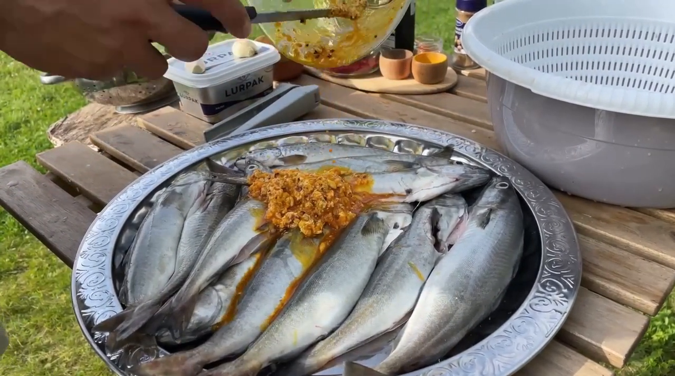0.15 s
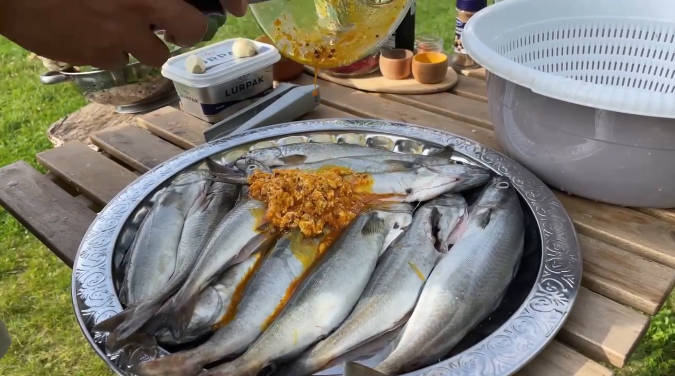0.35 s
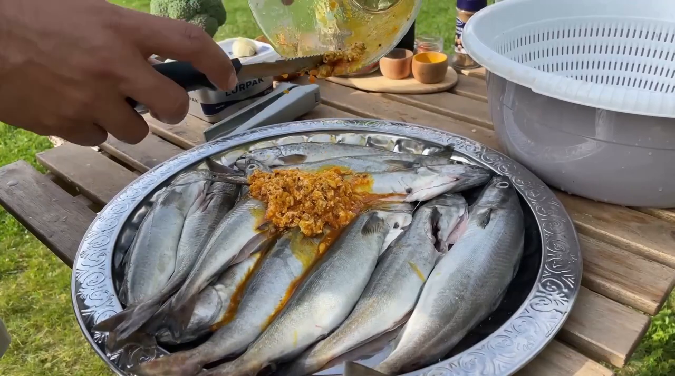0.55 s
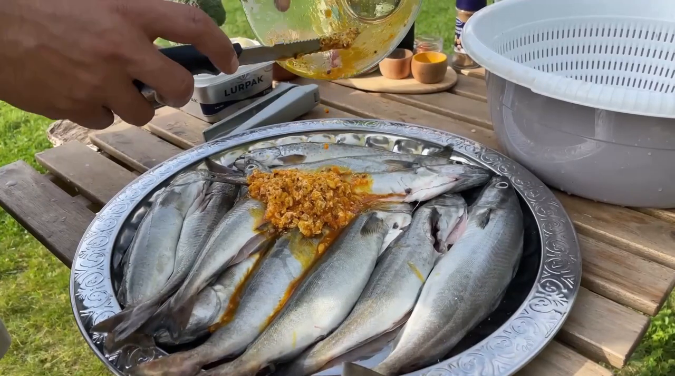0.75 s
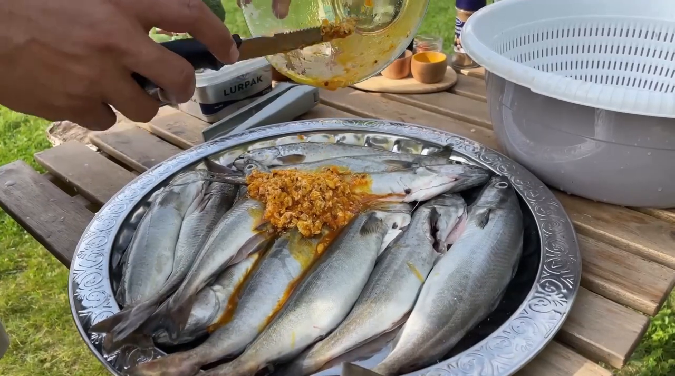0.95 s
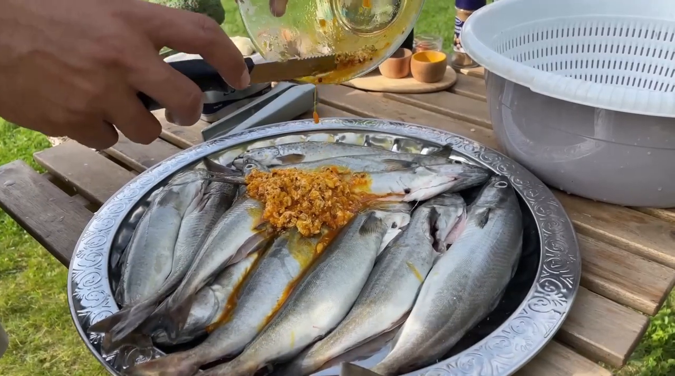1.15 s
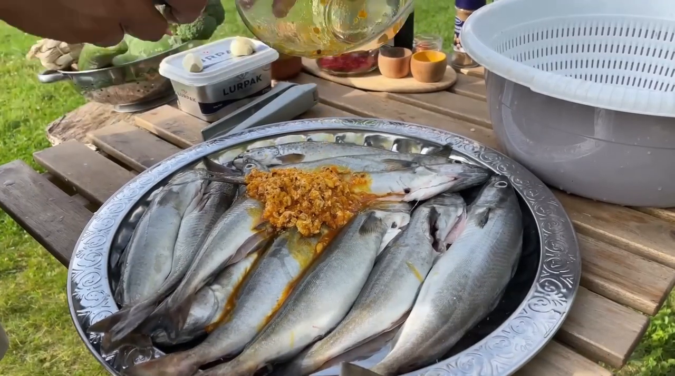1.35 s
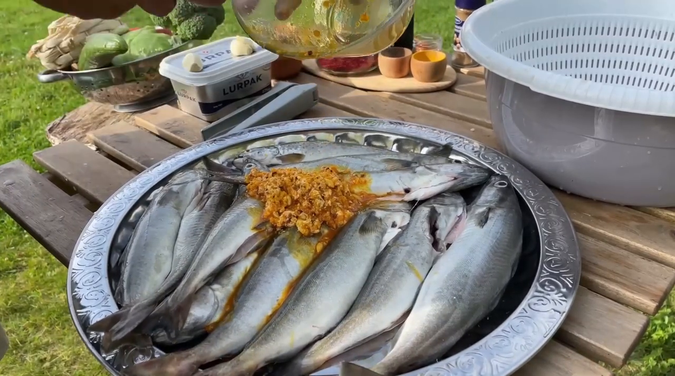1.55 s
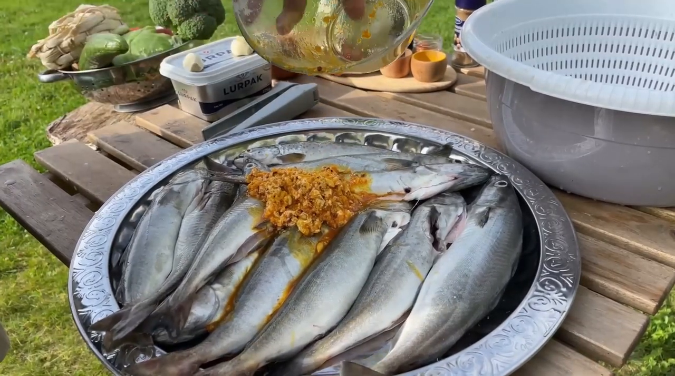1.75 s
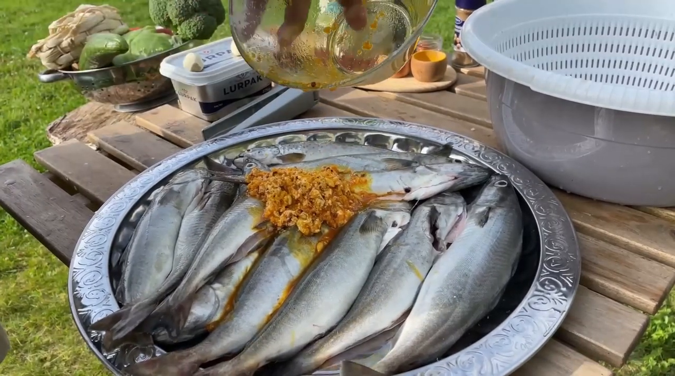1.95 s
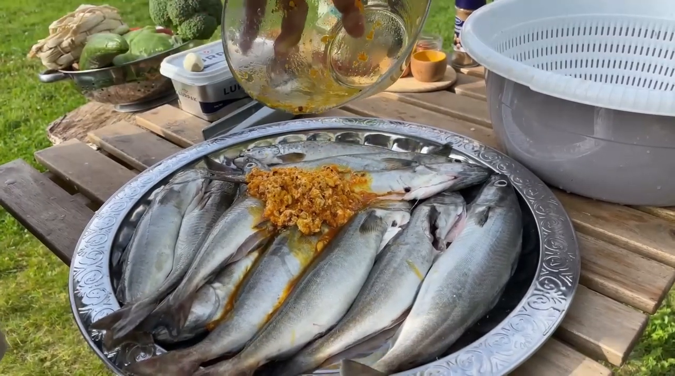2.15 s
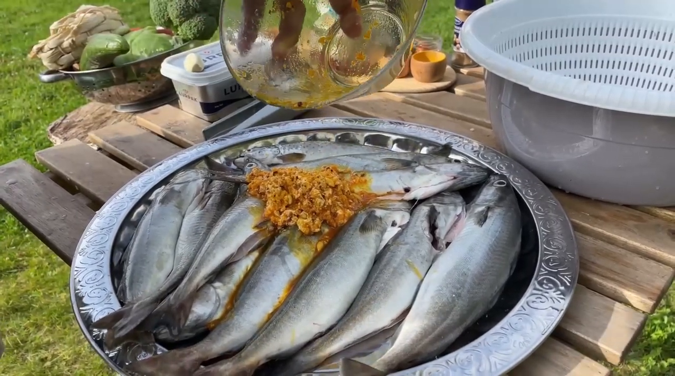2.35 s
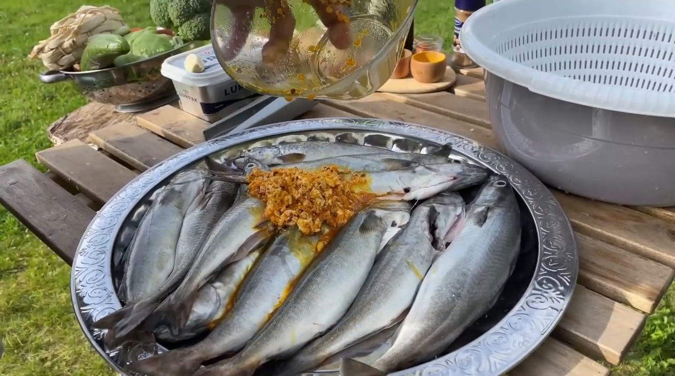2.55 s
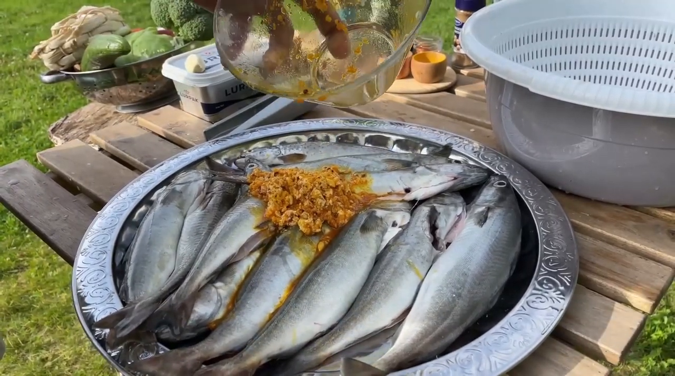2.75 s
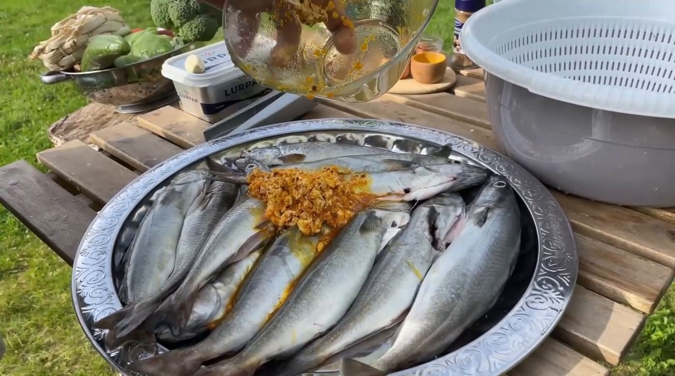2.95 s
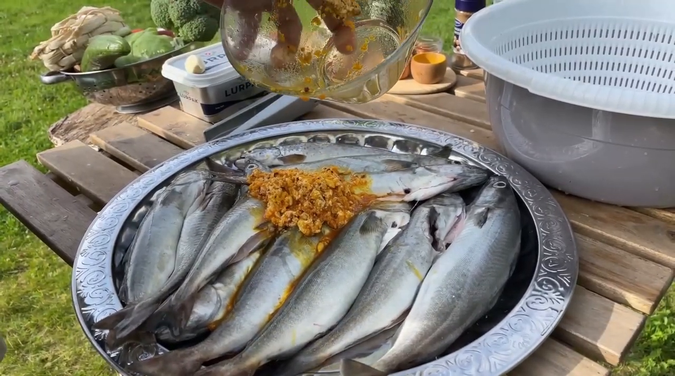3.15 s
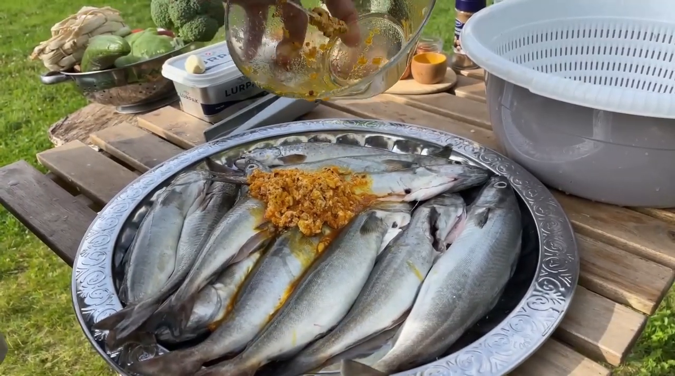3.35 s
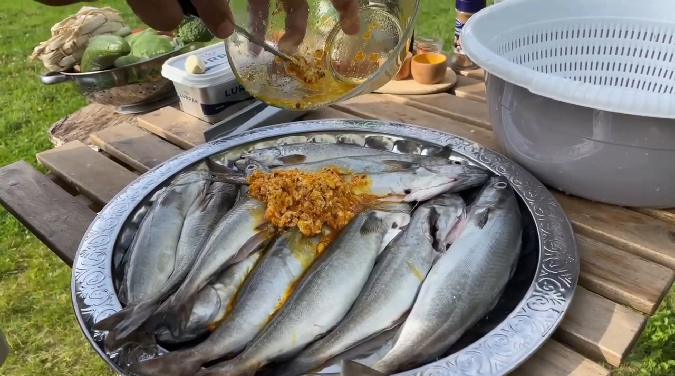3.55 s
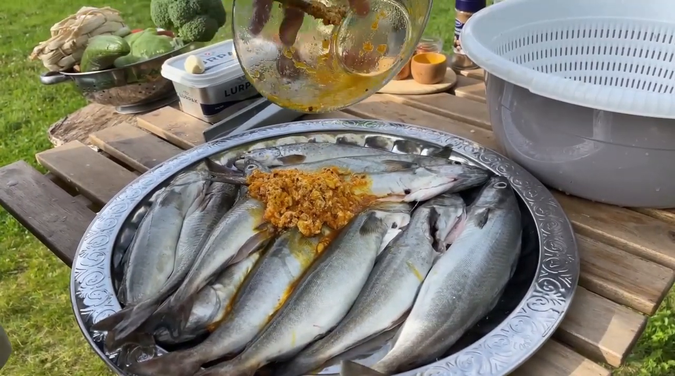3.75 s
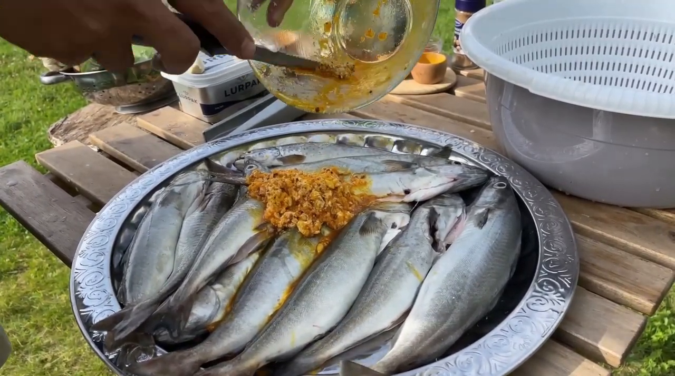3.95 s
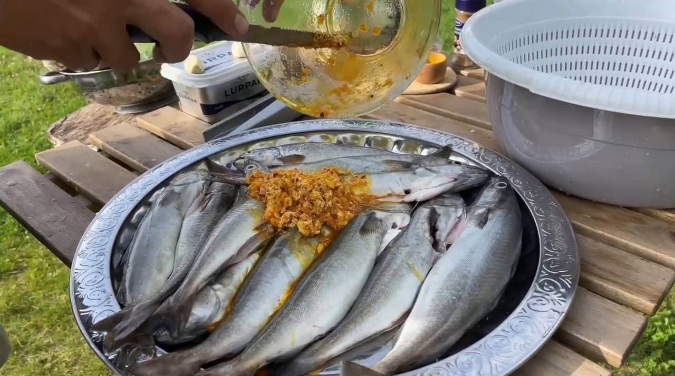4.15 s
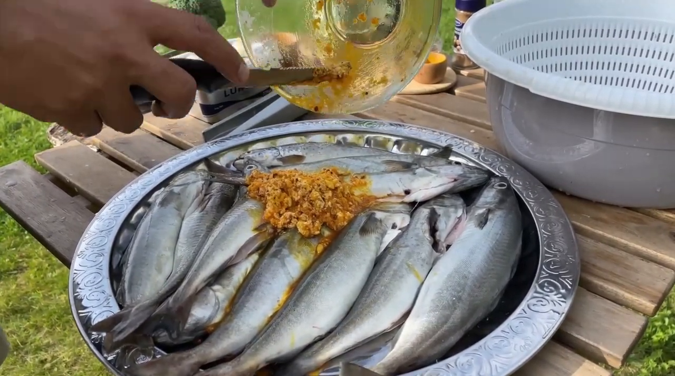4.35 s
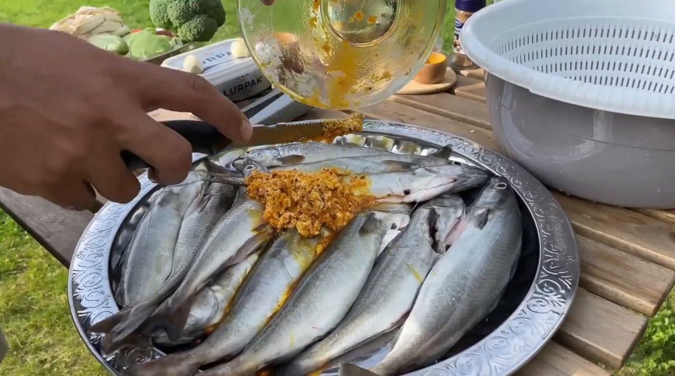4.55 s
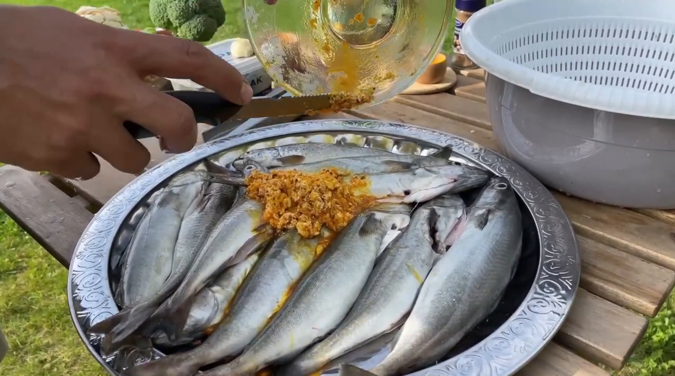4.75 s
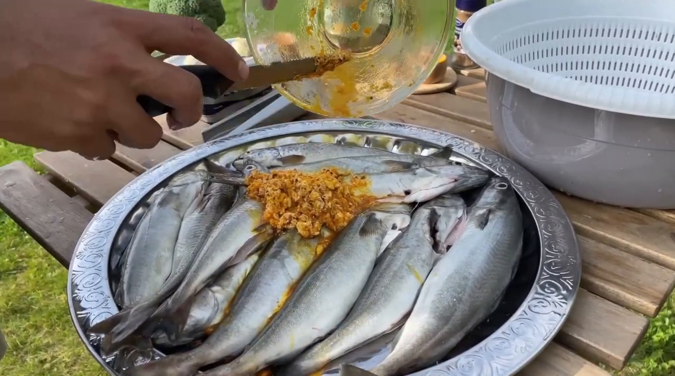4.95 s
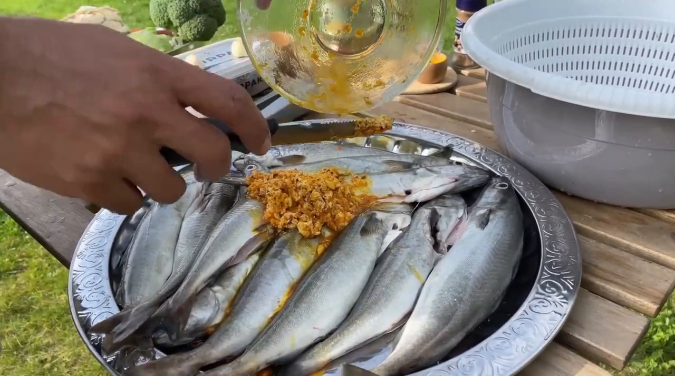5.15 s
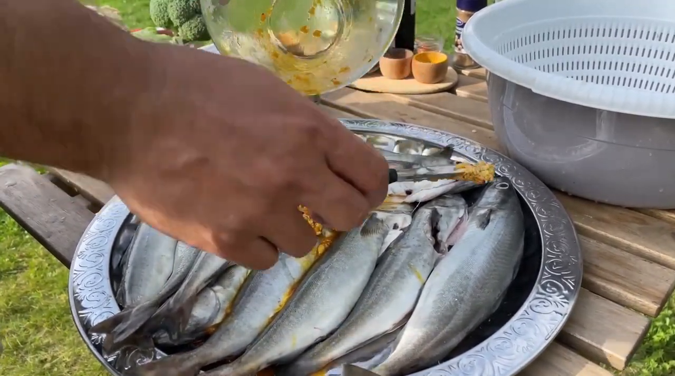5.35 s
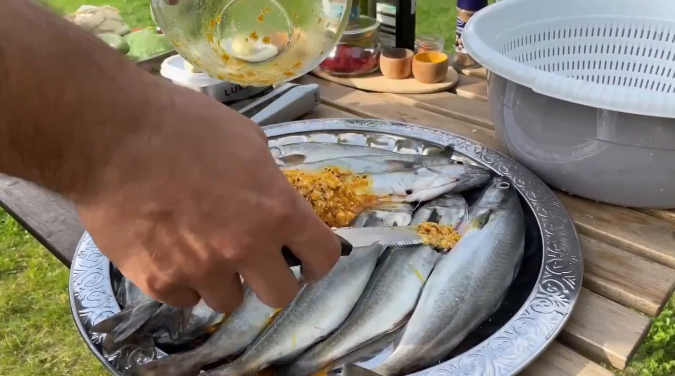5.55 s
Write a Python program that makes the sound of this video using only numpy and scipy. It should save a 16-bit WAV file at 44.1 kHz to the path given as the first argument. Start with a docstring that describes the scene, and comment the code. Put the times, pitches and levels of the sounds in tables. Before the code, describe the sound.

Close outdoor sound of a metal blade knocking a paste-coated glass bowl held in the hand. Two bright, hard clinks come in the first second among lighter ticks and scrapes, then a near-quiet gap with only traffic rumble, then scattered clinks and gritty drags, busier from about three seconds, a strong clink near five, then almost nothing. Dry, small stereo microphone.

```python
"""A steel blade taps and scrapes a hand-held glass bowl outdoors, near a small two-port microphone.
Each tap is a sum of decaying sine modes plus a crack of noise; hand and wet paste keep it short,
with a faint after-ring. Scraping is uneven noise, heard directly and through the glass modes.
Nearby surfaces add a short tail of decaying noise, and a soft narrow rustle passes once.
Far traffic underneath is filtered noise: a rumble, a drone and a faint hiss."""
import sys
import numpy as np
from scipy import signal
from scipy.fft import rfft, irfft, next_fast_len
from scipy.io import wavfile
from scipy.ndimage import uniform_filter1d, map_coordinates

SR = 44100
rng = np.random.default_rng(int(sys.argv[2]) if len(sys.argv) > 2 else 0)


def unload_wav(signal):
    """Save mono or channel-first audio to the path in sys.argv[1] as 16-bit WAV at rate SR, clipped to [-1, 1]."""
    wavfile.write(
        sys.argv[1],
        SR,
        np.round(np.clip(np.atleast_2d(signal).T, -1, 1) * 32767).astype(np.int16),
    )


def to_linear_factor(level_db):
    """Convert decibel levels (scalar or array-like) to linear amplitude factors."""
    exponent = np.asarray(level_db, float) / 20
    return 10 ** exponent


N = 247401  # length in samples, about 5.6 s


def unit(x):
    """Scales x to rms 1."""
    return x / np.sqrt(np.mean(x ** 2) + 1e-20)


def along(points, hz, axis=1):
    """Reads one column of a table that starts with frequency, on a log frequency axis."""
    columns = np.transpose(points)
    return np.interp(np.log(hz + 1), np.log(columns[0] + 1), columns[axis])


def curves(rows):
    """Turns each column after the time into one value per sample."""
    s, *columns = np.transpose(rows)
    return [np.interp(np.arange(N) / SR, s, column) for column in columns]


def wobble(rate):
    """A smooth random curve with `rate` random points a second."""
    knots = rng.standard_normal(int(N * rate / SR) + 4)
    return map_coordinates(knots, [np.arange(N) * rate / SR])


def filtered(x, response):
    """Filters x by a (possibly complex) response given as a function of frequency in Hz."""
    n = x.shape[-1]
    padded = next_fast_len(n + 8192)
    spectrum = rfft(x, padded) * response(np.fft.rfftfreq(padded, 1 / SR))
    return irfft(spectrum, padded)[..., :n]


def patches(patchy_db, channels, size=1024):
    """White noise made uneven in patches of time and frequency; a small size gives brief, wide ones."""
    z = signal.stft(rng.standard_normal((channels, N)), nperseg=size)[2]
    field = rng.standard_normal(z.shape[1:])
    field = uniform_filter1d(field, size=5, axis=0)  # smooth over frequency
    field = uniform_filter1d(field, size=4, axis=1)  # smooth over time
    return signal.istft(z * to_linear_factor(patchy_db * unit(field)), nperseg=size)[1][:, :N]


# Contacts of blade on glass; where the blade lands sets the tone, relative to 2.8 kHz:
# (time [s], level before a shared boost [dB], 0.8 kHz [dB], 1.8 kHz [dB], 4.5 kHz [dB])
CONTACTS = [(0.0034, -43.5, -39, 6, -0.5), (0.187, -30, -5.5, -4, 0), (0.2282, -31, 1, 4.5, 9.5),
            (0.3474, -48.5, -23.5, -44, -15), (0.4596, -57, -12.5, -7.5, 5.5),
            (0.647, -13.5, -14.5, -3, -1.5), (0.6875, -43.5, -25.5, -29, -21.5),
            (0.8446, -74, 19.5, -10.5, -28), (0.9652, -13.5, -23, -9, -8.5), (1.0034, -56, -12, -4, 6),
            (1.7113, -94, -10, 2.5, 21), (2.0625, -32.5, -15, 0.5, -1), (2.6058, -33.5, -19.5, -2.5, -0.5),
            (2.8053, -65.5, -15.5, -10, 1.5), (2.8387, -65, -15, -4.5, 0.5), (3.1476, -32, -5, -6, 7.5),
            (3.2281, -22, -3.5, -12, -1.5), (3.625, -23.5, -9, -3.5, 5), (3.7288, -25.5, 6, -2.5, -3.5),
            (3.8821, -57.5, -31, -8.5, -17.5), (4.1666, -22.5, -2, 3, -0.5), (4.2138, -32, -24, -5, -16.5),
            (4.5403, -39, 2, 8, 15.5), (4.5542, -36, -5.5, -3, -0.5), (4.647, -64.5, -16.5, -2, 11.5),
            (4.9281, -15.5, -13, -13.5, -7), (4.9852, -36.5, -16.5, -2, -18), (5.036, -35, -26, 1, 1.5),
            (5.4558, -74, -12, -5, 0.5)]
# Frequencies of the tone points: (frequency [Hz])
TONE_POINTS = [800, 1800, 2830, 4500, 7000]
# How loosely the hand holds the bowl, higher is looser: (time [s], looseness [dB])
HAND_GRIP = [(.23, -3.5), (.97, 0), (2.6, 2.5), (3.15, 2), (3.23, -11), (3.62, 0), (4.93, -2), (5.04, -7.5)]


def taps():
    """Each contact of the blade rings the bowl's modes and cracks, with a fast, soft rise."""
    out, t = np.zeros(N + SR), np.arange(SR // 3) / SR
    rise = (1 - np.exp(-t / 0.00067)) ** 2
    for s, db, low, mid, high in CONTACTS:
        top = -4 + 0.62 * high  # 7 kHz and up follows the 4.5 kHz column
        tone = list(zip(TONE_POINTS, [low, mid, 0, high, top]))
        loose_db = np.interp(s, *np.transpose(HAND_GRIP))
        sound = ring(t, s, db, tone, loose_db) + crack(t, db, tone, loose_db)
        start = max(round((s - .0012) * SR), 0)  # the rise begins just ahead of the listed time
        out[start:][:len(t)] += to_linear_factor(db + 2.5) * rise * sound
    return out[:N]


# Modes of the bowl; t60 is the time to fall 60 dB, the first one at a looseness of 0 dB:
# (frequency [Hz], level [dB], t60 in the hand [s], after-ring relative to mode [dB], after-ring t60 [s])
BOWL_MODES = [(486, -11, .025, -45.5, .08), (805, 1.5, 0.026, -28.5, 0.19), (1294, -14, 0.016, -38, .08),
              (1694, 2, 0.02, -20, 0.1496), (1986, -6.5, .025, -35, .1), (2470, -22.5, 0.014, -34, .1),
              (2720, -21, .04, -28.5, .1), (2813, -6.5, 0.0083, -30, .15), (2867, -3, 0.038, -28, 0.25),
              (3284, -12.5, 0.01, -32.5, .1), (4236, 1, 0.017, -33, 0.27),
              (5100, -14, 0.0057, -24.5, 0.067), (5910, -11.5, .03, -25, 0.13), (6530, -8.5, .025, -25, .1),
              (7135, -4.5, 0.066, -19.5, 0.054), (7257, 0.5, 0.067, -19.5, .14),
              (7660, -0.5, 0.033, -27.5, 0.097), (8550, -6.5, .02, -38, .06), (8980, -3.5, .03, -24, .15),
              (9750, -4.5, 0.032, -23, .15), (10760, -9.5, .03, -24, .12), (11200, -10.5, .025, -28, .1),
              (11590, -14.5, 0.046, -28, .1), (11770, -6, 0.0085, -26, .1)]


def ring(t, s, db, tone, loose_db):
    """Decaying glass modes: a harder blow chatters longer, a loose grip rings louder and longer."""
    hz, mode_db, t60, late_db, late_t60 = np.transpose(BOWL_MODES)[:, :, None]
    chatter = 0.032 * to_linear_factor(0.95 * db)  # seconds before the damping sets in
    free = np.maximum(t - chatter, 0) / to_linear_factor(0.27 * loose_db)
    # every blow finds new strengths (dB), phases and paste load (share of pitch)
    luck = rng.standard_normal((len(hz), 3)) * [3, 1.5, .006]
    phase = 2 * np.pi * hz * (1 + luck[:, 2:]) * t + luck[:, 1:2]
    clink = to_linear_factor(-3.5 * np.minimum(t / chatter, 1) - 60 * free / t60) * np.sin(phase)
    # paste and fingers shift on the wall, so the after-ring wavers
    drift = .07 * np.minimum(hz / 3500, 1) * rng.standard_normal(phase.shape)
    waver = np.cumsum(drift, axis=1)
    after = to_linear_factor(late_db + 0.37 * loose_db - 60 * t / late_t60) * np.sin(phase + waver)
    # while the bowl is turned a fingertip mutes the mode near 4.2 kHz
    muted_db = -16.5 * (1.5 < s < 3.7) * (np.abs(hz - 4230) < 300)
    strength = to_linear_factor(mode_db + muted_db + along(tone, hz) + 0.61 * loose_db + luck[:, :1])
    return (strength * (clink + after)).sum(0)


# Spectrum of the contact noise: (frequency [Hz], relative level [dB])
CRACK_SPECTRUM = [(100, -27.5), (300, -2), (1000, -1.5), (3000, -8.5), (7500, -7), (9000, -6), (12000, -14),
                  (13500, -44.5), (16000, -68.5)]


def crack(t, db, tone, loose_db):
    """Contact noise: a light touch is mostly this, a hard blow mostly ring."""
    white = rng.standard_normal(len(t))
    noise = unit(filtered(white, lambda f: to_linear_factor(along(CRACK_SPECTRUM, f) + 0.66 * along(tone, f))))
    snap = noise * to_linear_factor(-2.0 - 0.29 * db - 0.31 * loose_db - 60 * t / 0.022)
    # the longer, quieter noise tail is low-passed near 7.6 kHz
    dull = filtered(noise, lambda f: 1 / (1 + (f / 7600) ** 12))
    tail = dull * to_linear_factor(-32 - 0.4 * loose_db - 60 * t / 0.18)
    hz = np.transpose(BOWL_MODES)[0]
    tone_strength = np.sqrt(np.mean(to_linear_factor(along(tone, hz)) ** 2))
    return (snap + tail) * tone_strength


# How well rubbing drives each mode: (frequency [Hz], relative level [dB])
RUB_DRIVE = [(800, -20), (1700, -8.5), (4200, -14.5), (7200, -4), (8800, -9.5), (11000, -0.5),
             (12000, -6.5)]


def singing(f):
    """Response of the glass modes to rubbing: one resonance 70 Hz wide per mode."""
    total = 0
    for centre, db, *_ in BOWL_MODES:
        resonance = 1j * f * 70 / (centre * centre - f * f + 1j * f * 70)
        total = total + to_linear_factor(db + along(RUB_DRIVE, centre)) * resonance
    return total


# The blade dragged through paste; a negative fade swells:
# (start [s], length [s], level at the start [dB], fade [dB/s])
DRAG_STROKES = [(0.268, .18, -55.5, 99), (0.7, 0.18, -60, 120.5), (2.08, 0.25, -76.5, -23),
                (2.63, 0.06, -65.5, 60), (2.731, 0.14, -65, 2), (3.163, .045, -51.5, 350),
                (3.272, .17, -59, 209), (3.663, .065, -62, 200), (3.763, 0.17, -59, 45),
                (4.16, 0.021, -56.5, 92), (4.245, 0.135, -72, 20), (4.387, 0.051, -69, -300),
                (4.559, 0.16, -70.5, 139.5), (4.934, 0.016, -51.5, 17.5), (5.085, 0.11, -82, 200.5),
                (5.335, 0.11, -92, -150), (5.521, 0.077, -98.5, -250)]
# Places where the edge bites into grit and lets go:
# (time [s], level [dB], spread of the bell-shaped swell [s])
GRIT_BITES = [(0.021, -60, 0.0033), (0.279, -46, 0.005), (0.309, -50, 0.0047), (0.323, -54, 0.0025),
              (0.398, -55.5, 0.0052), (2.102, -63, 0.0025), (2.128, -65, 0.0067), (2.16, -62, 0.0024),
              (2.211, -70.5, .006), (2.303, -70, 0.009), (2.74, -74, 0.013), (3.215, -60, .003),
              (3.427, -77, .015), (3.718, -44, 0.0052), (3.745, -44, 0.012), (3.891, -67, 0.0055),
              (4.27, -67, 0.0054), (4.329, -71, 0.0068), (4.461, -36, 0.0087), (4.652, -53, 0.0075),
              (5.254, -70.5, .006), (5.399, -73.5, 0.0073), (5.434, -59, 0.0032)]
# Spectrum of the direct hiss: (frequency [Hz], relative level [dB])
DRAG_HISS = [(1000, -26.5), (1700, -3.5), (2900, -7), (3630, -12.5), (4200, -9), (6100, -7.5), (7400, -8),
             (7900, -29), (12000, -27.5), (13000, -53.5)]


def scrape():
    """Uneven grit under the blade hisses directly and keeps the glass modes singing."""
    t = np.arange(N) / SR
    landing, lifting = 2497, 252  # how fast a stroke sets in and dies away, dB/s
    motion = np.zeros(N)
    for s, length, db, fade in DRAG_STROKES:
        before = np.maximum(s - t, 0)
        after = np.maximum(t - s - length, 0)
        motion += to_linear_factor(db - fade * np.clip(t - s, 0, length) - landing * before - lifting * after)
    for s, db, spread in GRIT_BITES:
        motion += to_linear_factor(db) * np.exp(-.5 * ((t - s) / spread) ** 2)
    uneven = patches(4, channels=1, size=256)[0]
    grit = uneven * to_linear_factor(1.4 * wobble(43) + 4.5 * wobble(380))
    colour = lambda f: to_linear_factor(along(DRAG_HISS, f)) + to_linear_factor(12.5) * singing(f)
    grit = grit / np.std(filtered(grit, colour))  # so the tables set the level
    return filtered(motion * grit, colour)


# The bowl as the two ports hear it:
# (frequency [Hz], left over right [dB], phase by which left leads [radians])
PORT_DIFFERENCE = [(295, 0, 0.9), (810, 7, 0.1), (1770, 2, 1.76), (2140, 4.5, -0.4), (2800, 6, 1.49),
                   (4219, 2.5, 1.4), (4840, 10, 1), (5900, 0, -1), (7150, 5.5, -2), (7730, -1.5, -2.5),
                   (8250, 0, -2.5), (9590, -0.5, -4), (11400, 0.5, -5), (12600, -0.5, -4)]


def ports(x):
    """Level and phase differ between the two ports, half on each side."""
    def half(f):
        phase = along(PORT_DIFFERENCE, f, axis=2)
        return to_linear_factor(along(PORT_DIFFERENCE, f) / 2) * np.exp(.5j * phase)
    return filtered(x, lambda f: np.array([half(f), 1 / half(f)]))


# Decay of the tail from nearby surfaces: (frequency [Hz], time to fall 60 dB [s])
SURFACE_DECAY = [(300, .06), (3000, 0.04), (12000, 0.027)]


def nearby(x):
    """Table, tray and basin scatter back a short tail: noise that decays faster at high pitch."""
    hz, t, z = signal.stft(rng.standard_normal((2, SR // 4)), SR, nperseg=256)
    decay = to_linear_factor(-60 * t / along(SURFACE_DECAY, hz)[:, None])
    tail = signal.istft(z * decay, SR, nperseg=256)[1]
    delayed = np.pad(x, (130, 0))[None]  # about 3 ms later
    return signal.fftconvolve(delayed, tail / np.linalg.norm(tail[0]), axes=1)[:, :N]


# One soft, distant chirr, bell-shaped in time and frequency:
# (time [s], level [dB], spread in time [s], centre [Hz], spread in frequency [Hz])
FAR_CHIRR = (1.318, -74, .018, 3450, 400)


def chirr():
    """A brief narrow rustle far off: band-limited noise that swells and fades."""
    s, db, spread, hz, band_hz = FAR_CHIRR
    white = rng.standard_normal((2, N))
    narrow = unit(filtered(white, lambda f: np.exp(-((f - hz) / band_hz) ** 2)))
    return to_linear_factor(db) * np.exp(-.5 * ((np.arange(N) / SR - s) / spread) ** 2) * narrow


# How alike left and right are: (frequency [Hz], correlation from -1 to 1)
LIKENESS = [(60, 0.95), (130, .87), (280, 0.74), (590, -.7), (1280, -0.78), (2700, .2), (12000, -0.9)]


def rush(spectrum, patchy_db):
    """Stereo background noise of rms 1; the mid/side balance sets how alike the channels are."""
    def mid_side(hz):
        turn = np.arccos(np.clip(along(LIKENESS, hz), -1, 1)) / 2
        return to_linear_factor(along(spectrum, hz)) * [np.cos(turn), np.sin(turn)]
    mid, side = filtered(patches(patchy_db, channels=2), mid_side)
    return unit(np.array([mid + side, mid - side]))


# Traffic over time: (time [s], rumble before wavering [dB], drone before wavering and a boost [dB])
TRAFFIC_LEVELS = [(0.0, -57.5, -62.5), (0.4, -57.5, -68), (0.9, -58, -65), (2.2, -57.5, -65.5),
                  (3.0, -58, -64.5), (4.8, -57, -64.5), (5.61, -58.5, -64.5)]
# Spectrum of the rumble: (frequency [Hz], relative level [dB])
RUMBLE_SPECTRUM = [(12, -55.5), (20, -27.5), (27, -23), (44, -7), (65, 2.5), (235, -14.5), (296, -23.5),
                   (443, -16), (500, -26), (650, -54), (1100, -120)]
# Spectrum of the tyre drone: (frequency [Hz], relative level [dB])
DRONE_SPECTRUM = [(290, -38.5), (500, -10.5), (620, -10.5), (800, 0), (1130, -2.48), (1260, -27),
                  (1500, -60)]
# Spectrum of the faint far hiss: (frequency [Hz], relative level [dB])
FAR_HISS_SPECTRUM = [(1200, -40), (1400, -9.5), (1650, -17), (1800, 3.5), (2250, -10), (2860, -19.5),
                     (4100, -15.5), (7400, -24), (11000, -24), (13000, -35)]


def traffic():
    """A wavering rumble, a little to the left, a tyre drone and a faint far hiss, all of uneven noise."""
    rumble_db, drone_db = curves(TRAFFIC_LEVELS)
    left_right_db = [[.8], [-.8]]
    rumble_level = to_linear_factor(rumble_db + 0.54 * wobble(1.9) + left_right_db)
    rumble = rumble_level * rush(RUMBLE_SPECTRUM, patchy_db=1.5)
    drone = to_linear_factor(drone_db + 8.0 + .8 * wobble(8)) * rush(DRONE_SPECTRUM, patchy_db=4.5)
    far_hiss = to_linear_factor(-80.5) * rush(FAR_HISS_SPECTRUM, patchy_db=4.5)
    return rumble + drone + far_hiss


def scene():
    """Bowl, its short echo, the far chirr and the traffic."""
    bowl = taps() + scrape()
    return ports(bowl) + to_linear_factor(-23.5) * nearby(bowl) + chirr() + traffic()


def top_cut(x):
    """Nothing passes above the cut-off."""
    return signal.sosfilt(signal.butter(12, 13240, fs=SR, output="sos"), x)


def record(dry):
    """The loudest peaks saturate softly and the top rolls off steeply near 12 kHz."""
    bent = dry / (1 + np.abs(dry / .85) ** 4) ** (1 / 4)
    finished = filtered(bent, lambda hz: 1 / (1 + (hz / 12100) ** 32))
    return top_cut(finished)


dry = scene()
out = record(dry)
unload_wav(out)
```